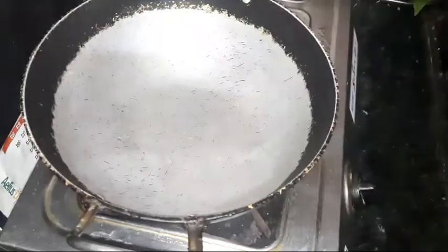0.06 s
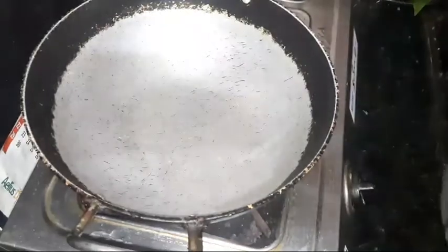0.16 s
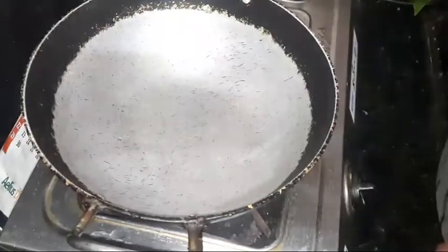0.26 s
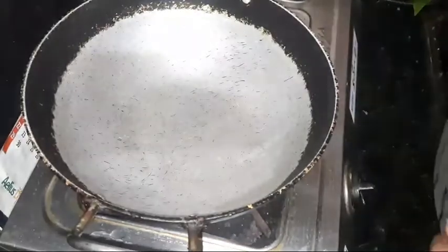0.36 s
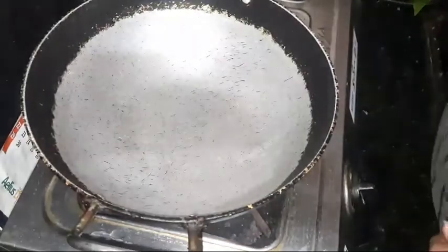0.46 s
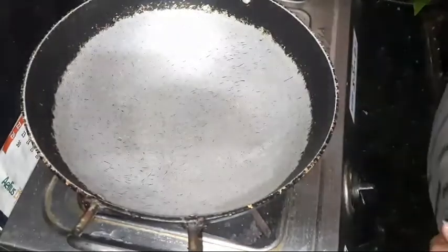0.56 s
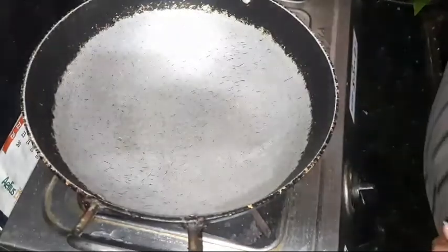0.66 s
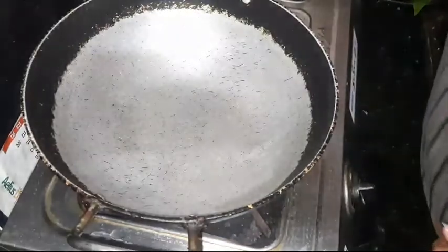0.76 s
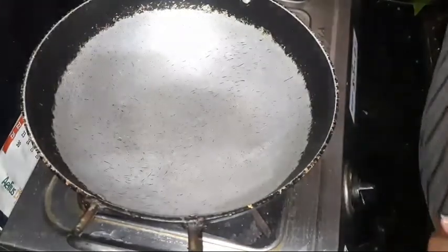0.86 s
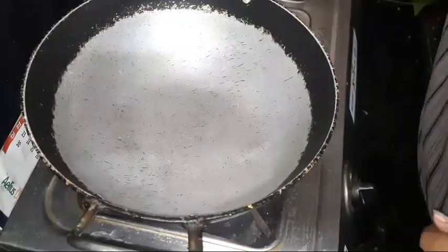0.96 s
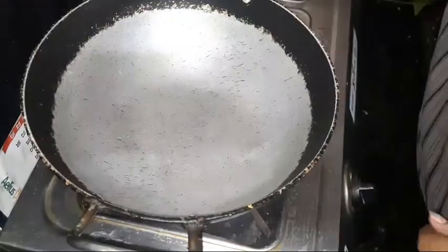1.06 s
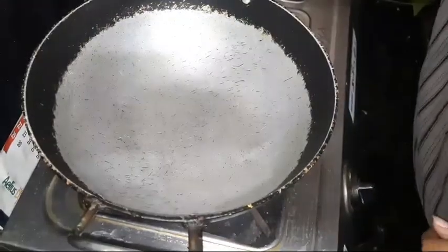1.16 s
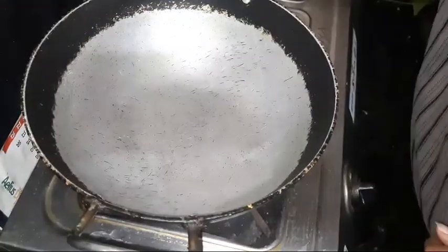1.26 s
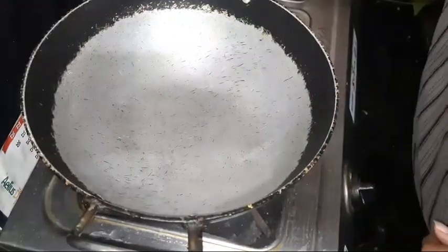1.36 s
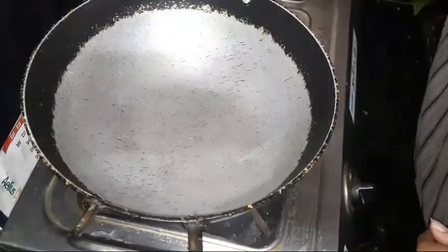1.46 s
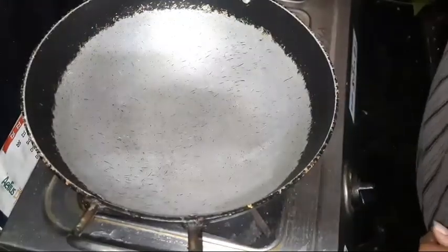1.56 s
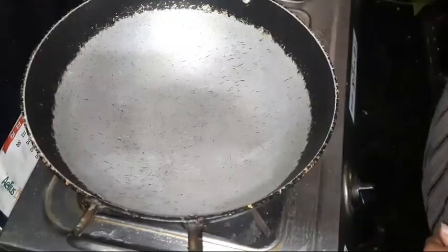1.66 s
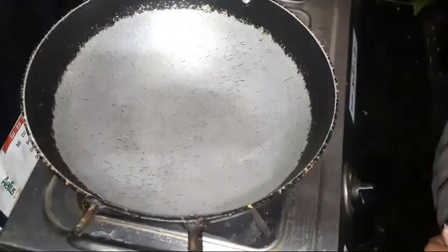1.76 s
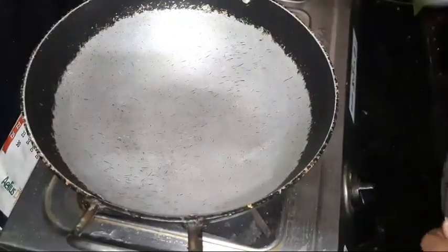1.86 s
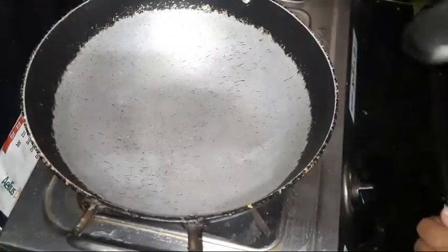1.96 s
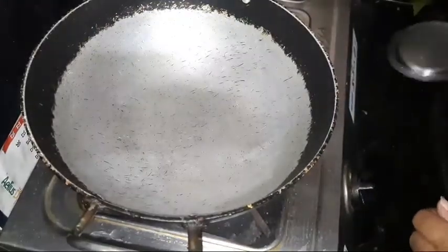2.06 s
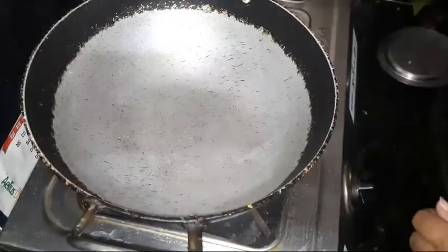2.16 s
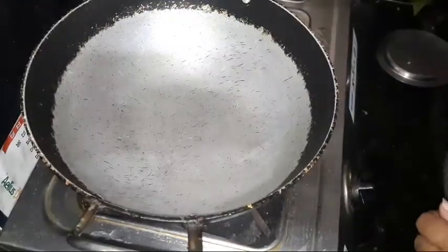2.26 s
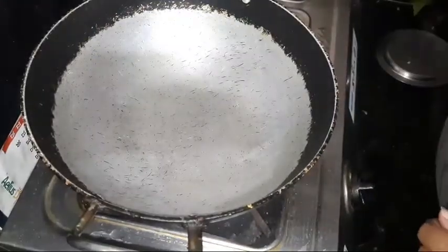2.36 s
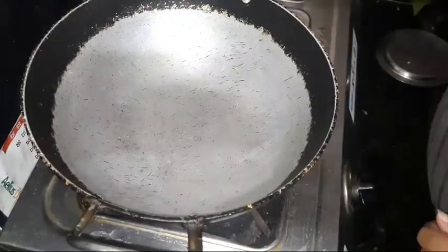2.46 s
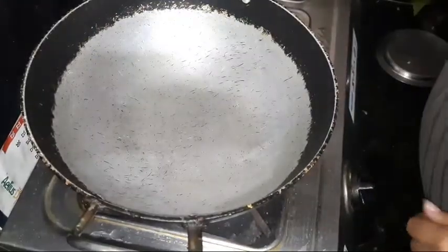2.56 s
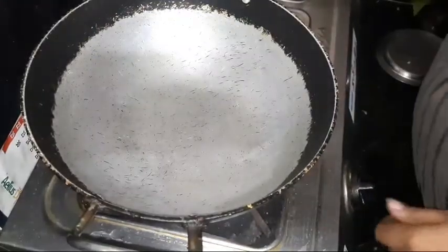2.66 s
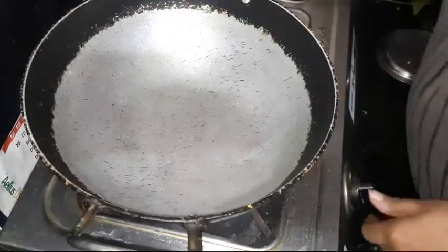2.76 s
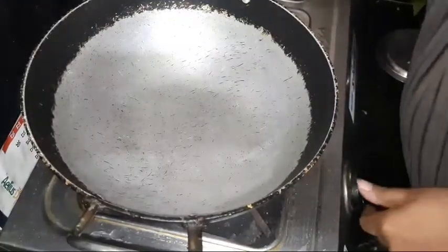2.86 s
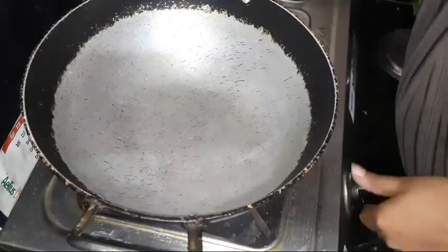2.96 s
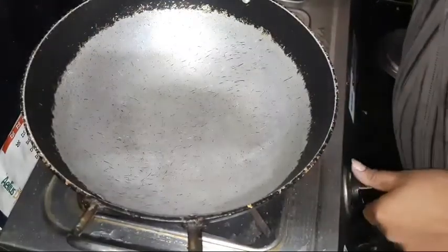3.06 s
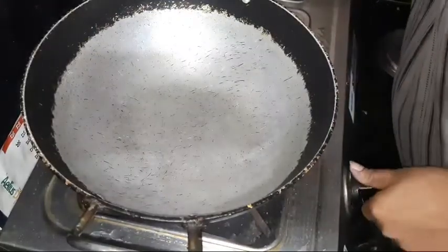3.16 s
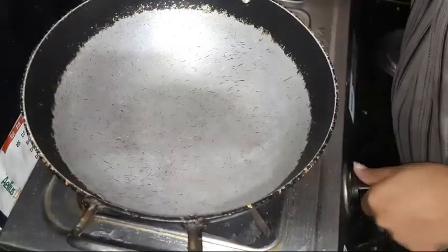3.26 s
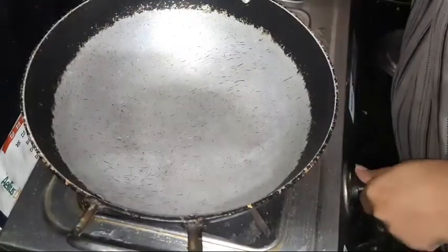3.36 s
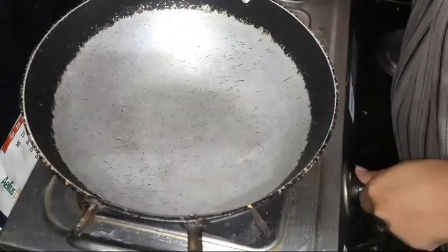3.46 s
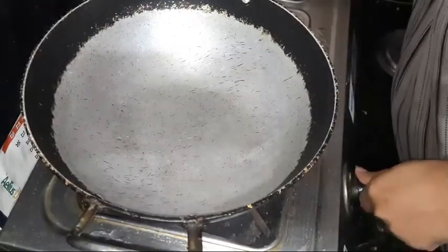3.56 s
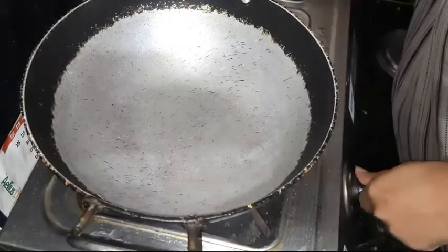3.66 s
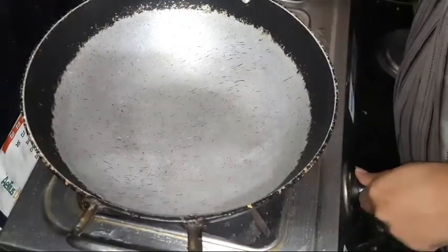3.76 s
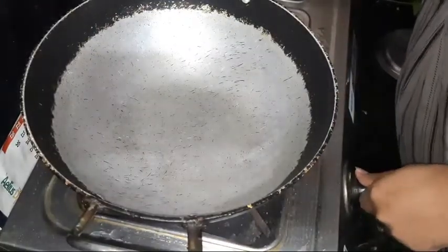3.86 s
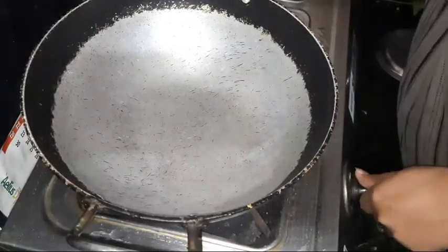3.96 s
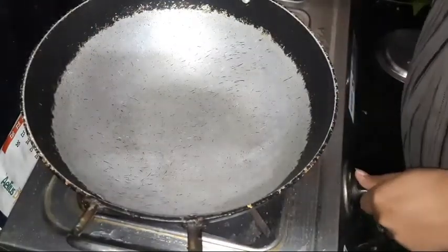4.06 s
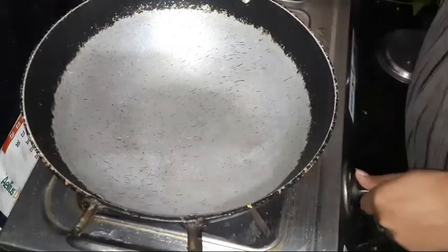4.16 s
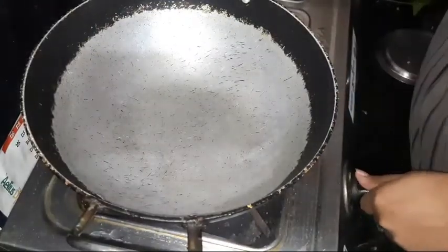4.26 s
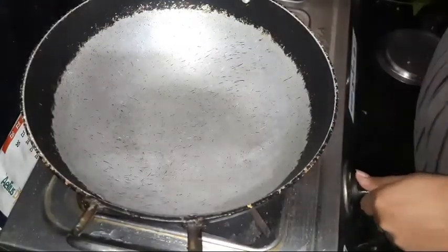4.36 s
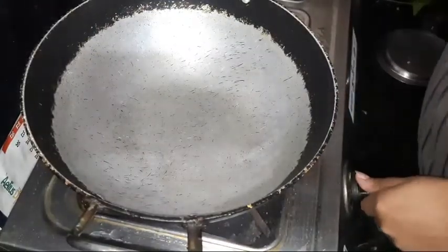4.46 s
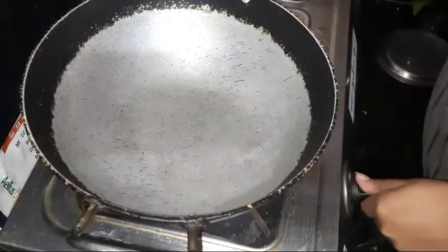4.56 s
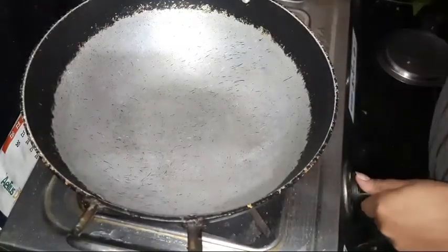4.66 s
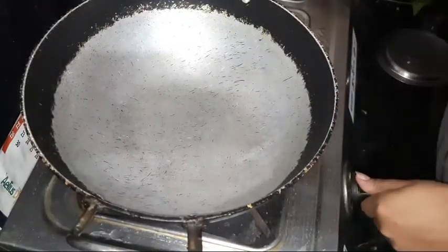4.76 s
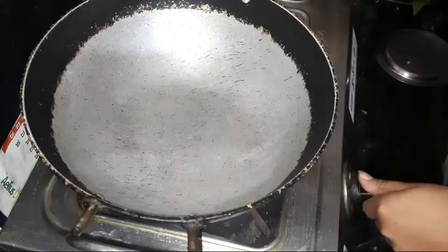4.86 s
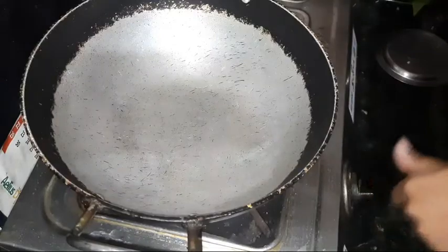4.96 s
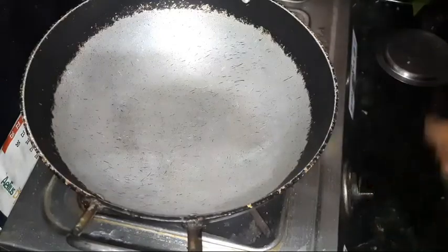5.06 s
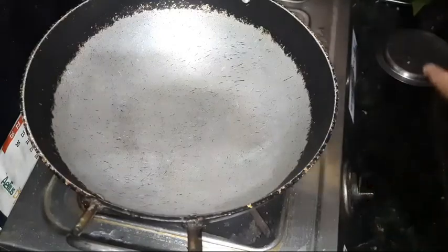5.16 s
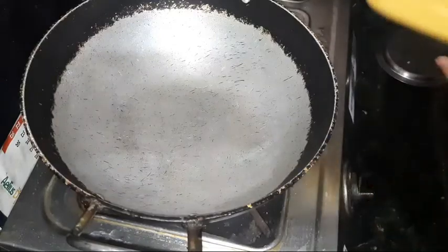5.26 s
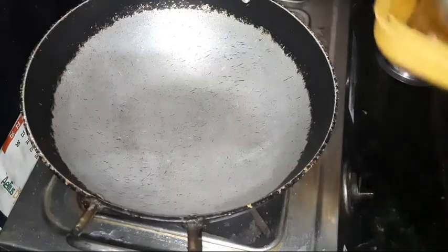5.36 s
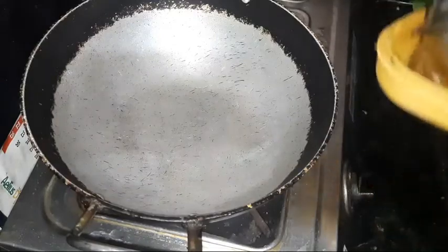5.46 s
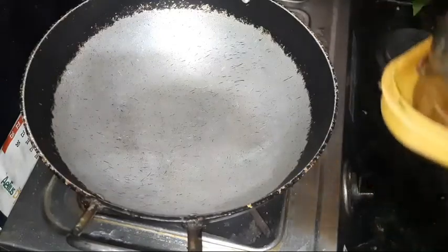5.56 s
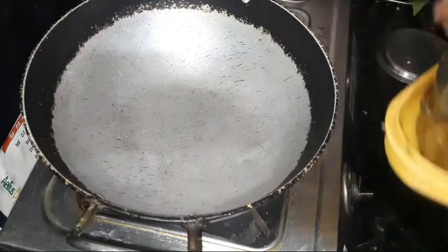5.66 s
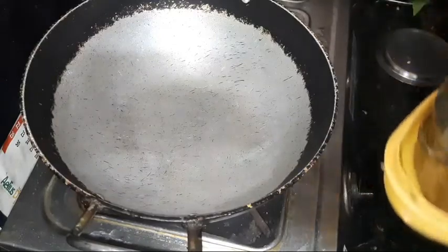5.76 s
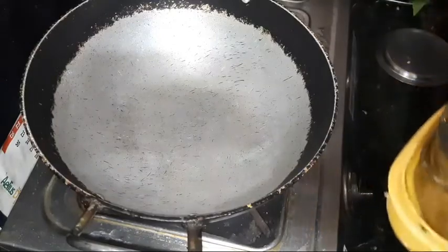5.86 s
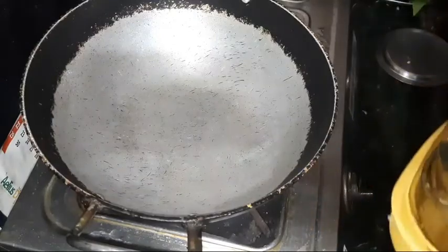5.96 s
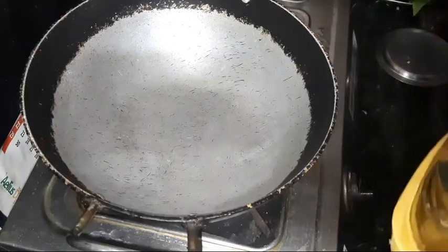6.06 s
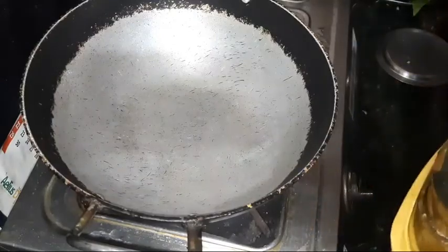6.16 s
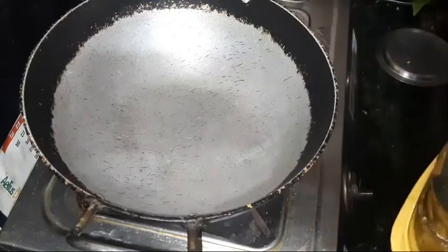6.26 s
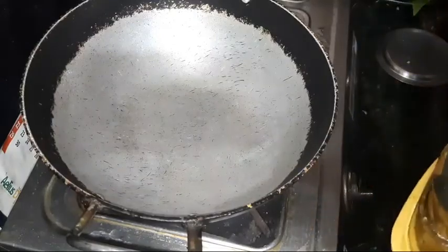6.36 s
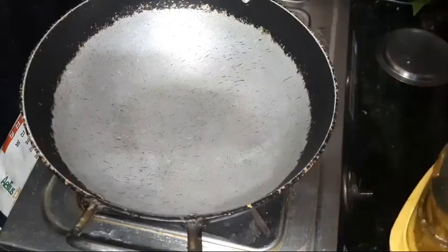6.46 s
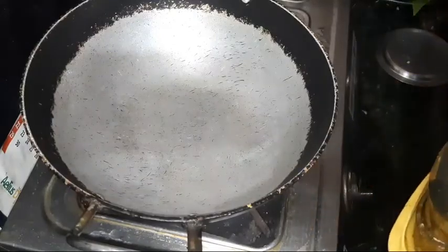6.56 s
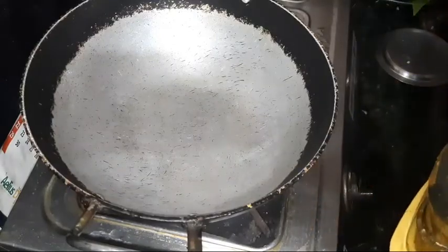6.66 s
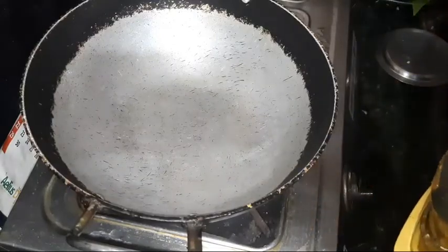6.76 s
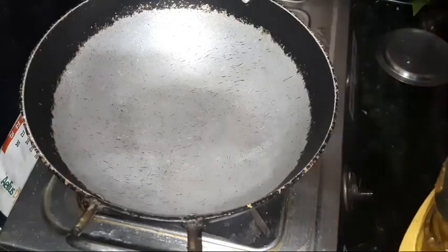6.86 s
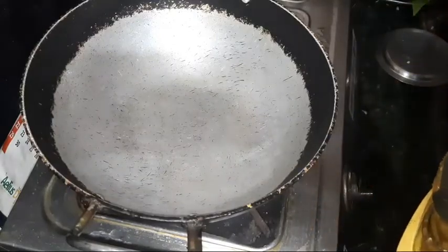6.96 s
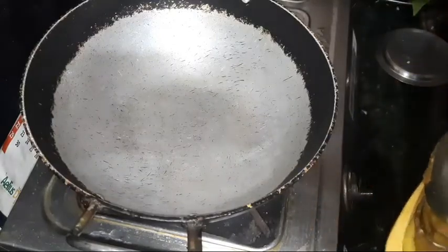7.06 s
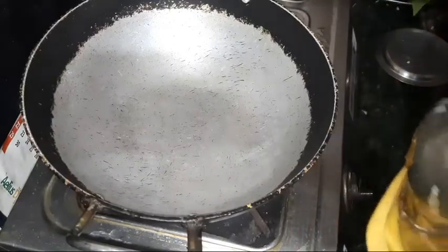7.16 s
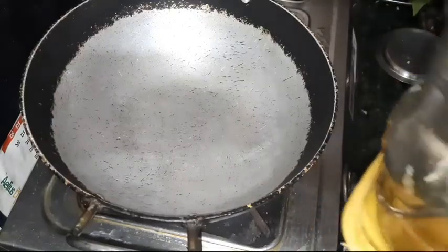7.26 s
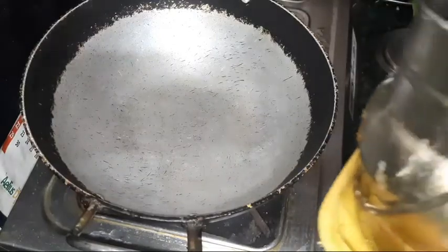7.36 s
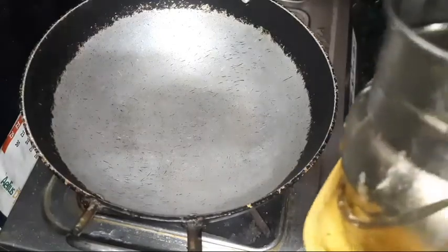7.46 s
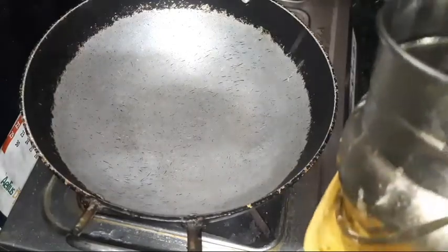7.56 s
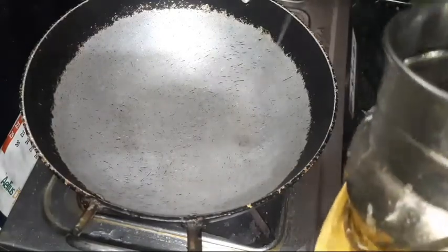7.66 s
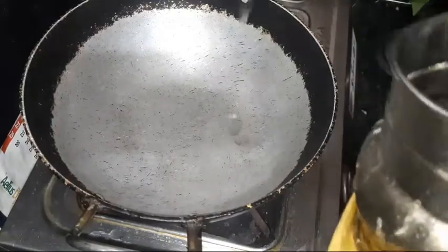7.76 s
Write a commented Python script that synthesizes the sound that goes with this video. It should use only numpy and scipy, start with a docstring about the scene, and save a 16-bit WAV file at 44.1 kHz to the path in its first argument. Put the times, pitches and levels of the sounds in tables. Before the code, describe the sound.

Close phone pickup of someone working at a stove, the actions a little to the right. Dry knocks lead to a short juddering metal scrape and a sharp multi-hit lid clash with a brief thin ring. After a pause, knob clunks, one small spark click and a muffled gas flare; the hiss later drops. Soft brushing follows, then a chattering cap, small twisting ticks and a hollow bump, all with short room reflections.

```python
"""A low wavering hum, room noise and a faint gas hiss come first, in a small hard-walled kitchen.
Dry utensil knocks follow; a steel lid, summed from decaying modes, slides over the counter and clashes down.
A stove knob clunks, a spark snaps, the burner flares in shaped noise, and an oil jug is lifted and opened.
Every blow reaches two microphones directly, the left one late, then off the stove top and the walls."""
import sys
import numpy as np
from scipy import signal
from scipy.fft import rfft, irfft, next_fast_len
from scipy.io import wavfile
from scipy.ndimage import map_coordinates

SR = 44100
rng = np.random.default_rng(int(sys.argv[2]) if len(sys.argv) > 2 else 0)


def digitize_waveform(pressure):
    """Quantize a signal to 16-bit integers and store it at the path in sys.argv[1].

    Rows of a 2-D input are taken as channels; values are limited to [-1, 1].
    """
    field = np.atleast_2d(pressure).T
    bounded = np.clip(field, -1, 1)
    quanta = np.round(bounded * 32767).astype(np.int16)
    wavfile.write(sys.argv[1], SR, quanta)


N = 344068  # samples in the scene
T = np.arange(SR) / SR  # time since a blow, s


def amp(db):
    """Decibels to gain."""
    return 10 ** (np.asarray(db) / 20)


def unit(x):
    """Scale to rms 1."""
    return x / np.sqrt(np.mean(x ** 2) + 1e-20)


def along(points, hz):
    """(f/Hz, value) points read on a log frequency axis."""
    f, value = np.transpose(points)
    return np.interp(np.log(hz + 1), np.log(f), value)


def swell(s, half):
    """A soft bell of gain around time s, down to 1/e at half seconds either side."""
    return np.exp(-((np.arange(N) / SR - s) / half) ** 2)


def stroke(s, rise, hold, t60):
    """Gain that climbs 60 dB in rise seconds to be full at s, holds, then falls 60 dB in t60."""
    t = np.arange(N) / SR - s
    return amp(-60 * (np.maximum(-t, 0) / rise + np.maximum(t - hold, 0) / t60))


def wobble(rate):
    """A smooth random curve, rate knots a second."""
    knots = rng.standard_normal(int(N * rate / SR) + 4)
    return map_coordinates(knots, [np.arange(N) * rate / SR])


def filtered(x, response):
    """x with its spectrum multiplied by a response of frequency."""
    n = x.shape[-1]
    m = next_fast_len(n + 8192, True)
    return irfft(rfft(x, m) * response(np.fft.rfftfreq(m, 1 / SR)), m)[..., :n]


# likeness of the two microphones' noise: f/Hz, correlation
ALIKE = [(100, 0.97), (300, 0.75), (600, .5), (1200, -0.13), (2500, 0.026), (5000, 0.041)]


def diffuse(size):
    """White noise from all sides: alike at both microphones only in the bass."""
    def mid_side_gains(hz):
        turn = np.arccos(np.clip(along(ALIKE, hz), -1, 1)) / 2
        return np.array([np.cos(turn), np.sin(turn)])
    mid, side = filtered(rng.standard_normal((2, size)), mid_side_gains)
    return np.array([mid + side, mid - side])


def rush(spectrum):
    """Coloured stereo noise of rms 1."""
    return unit(filtered(diffuse(N), lambda hz: amp(along(spectrum, hz))))


def pulse(spectrum, tilt=0):
    """The causal (minimum-phase) click of this spectrum, tilted in dB per octave."""
    hz = np.fft.rfftfreq(SR, 1 / SR)
    level_db = along(spectrum, hz) + tilt * np.log2(1 + hz / 300)
    cepstrum = irfft(np.log(amp(level_db)), SR)
    return irfft(np.exp(rfft(2 * cepstrum * (T < .5))), SR)


def body(resonances):
    """Decaying sines of (f/Hz, width/Hz, level/dB) resonances; wider ones die sooner."""
    return sum(amp(db) * width * np.exp(-np.pi * width * T) * np.sin(2 * np.pi * hz * T)
               for hz, width, db in resonances)


def chatter(life):
    """Noise of a contact that builds and breaks up within a few milliseconds; life in s."""
    return rng.standard_normal(SR) * T / life * np.exp(-T / life)


def snap(spectrum, life):
    """The coloured snap of a chattering contact."""
    return signal.fftconvolve(pulse(spectrum), chatter(life))[:SR]


# reverberation of the hard-walled kitchen: f/Hz, t60/s
KITCHEN_DECAY = [(80, 0.3), (300, 0.28), (1000, 0.28), (4000, 0.26), (9000, 0.23), (15000, 0.21)]


def kitchen(direct_db, lag, near_db=-8):
    """Path to the microphones: the direct sound, a quick splash off the stove top, then the walls."""
    hz, t, z = signal.stft(diffuse(SR // 2), SR, nperseg=256)
    decay = amp(-60 * t / along(KITCHEN_DECAY, hz)[:, None])
    tail = signal.istft(z * decay, SR, nperseg=256)[1]
    since = T[:tail.shape[1]]
    walls = tail * (1 - np.exp(-since / 0.0058))
    near = tail * np.exp(-since / 0.0018)
    path = walls / np.linalg.norm(walls[0]) + amp(near_db) * near / np.linalg.norm(near[0])
    # the blows are on the right: the left microphone hears them lag samples later
    path[[0, 1], [lag, 0]] += amp(direct_db)
    return path


def add(out, s, db, sound, direct_db, lag=19):
    """Play one blow through the kitchen at time s; db is its energy spread over 50 ms."""
    heard = signal.fftconvolve(sound[None], kitchen(direct_db, lag), axes=1)
    heard *= amp(db) * np.sqrt(SR / 10 / np.sum(heard ** 2))
    start = round(s * SR)
    out[:, start:start + heard.shape[1]] += heard[:, :N - start]


# colour of the room noise: f/Hz, relative level/dB
ROOM_NOISE = [(25, -7.5), (50, -5.5), (85, 5), (150, -1.5), (350, 0.5), (470, -0.5), (620, -8), (1000, -6),
              (1500, -14), (3000, -26), (7000, -32.5), (15000, -39)]
# steady low tones: f/Hz, level/dB before the slow level curve
HUM = [(79, -66), (101, -62), (196, -70), (277, -73), (316, -70), (350, -71.5)]
# slow level curve of room noise and hum: t/s, gain/dB
ROOM_LEVEL = [(0.1, -2.5), (.6, -0.5), (2.3, 0.5), (2.85, -3.5), (3.2, 1.5), (4.2, 1.5), (4.9, -0.5),
              (6.9, 0.5), (7.3, -1), (7.7, 0)]
# dull rustles of someone moving at the stove: t/s, half length/s, level/dB
RUSTLES = [(0.706, 0.13, -59), (3.207, 0.15, -65.5), (6.804, 0.56, -62), (7.72, 0.38, -60)]
ROOM_DB, ROOM_WAVER_DB = -61.5, 1.74  # room noise before the slow curve, and its unevenness


def background():
    """Room noise and wavering hum tones that rise and sink together, and dull noise rustles."""
    t = np.arange(N) / SR
    room = amp(ROOM_DB + ROOM_WAVER_DB * wobble(18)) * rush(ROOM_NOISE)
    rustle = sum(amp(db) * swell(s, half) for s, half, db in RUSTLES) * rush(ROOM_NOISE)
    hum = 0
    for hz, db in HUM:
        waver = wobble(11) + 1j * wobble(11) + 0.6
        hum = hum + amp(db) * unit(np.real(waver * np.exp(2j * np.pi * hz * t)))
    return amp(np.interp(t, *np.transpose(ROOM_LEVEL))) * (room + hum) + rustle


# steps in the flow of gas: t/s at mid-step, hiss level/dB from then on
VALVE = [(0, -65.5), (.4, -62.5), (3.54, -60), (4.52, -70)]
# colour of the gas hiss: f/Hz, relative level/dB
GAS = [(500, -18.5), (2000, -14), (4500, -7), (7000, -11), (10000, 0.5), (12000, -5), (15000, -9.5)]
# colour of soft thuds: f/Hz, relative level/dB
THUD = [(25, -22.5), (55, -23), (78, 7.5), (110, -3.5), (170, -18.5), (300, -43.5), (1000, -77.5)]
# colour of the spark and the flame's whoosh: f/Hz, relative level/dB
SPARK_TONE = [(300, 3), (700, -1.5), (1500, -0.5), (2700, 2.5), (4000, -2.5), (6000, -4), (10000, -2.5),
              (15000, -7.5)]
VALVE_TURN_S = 0.17  # time each step in the flow takes
FLARE_S, FLARE_RISE_S, FLARE_HOLD_S, FLARE_T60_S = 3.62, .4, .12, 0.3
FLARE_DB, FLARE_ROAR_DB, FLARE_WHOOSH_DB = -51.5, -54, -57.5  # thud, roar, whoosh


def burner():
    """The gas hisses as far as the valve is open; the flame catches with a soft thud, roar and whoosh."""
    t = np.arange(N) / SR
    hiss_db = VALVE[0][1]
    for (_, before), (s, db) in zip(VALVE, VALVE[1:]):
        hiss_db = hiss_db + (db - before) * np.clip((t - s) / VALVE_TURN_S + .5, 0, 1)
    flame = amp(FLARE_DB) * rush(THUD)
    flame += amp(FLARE_ROAR_DB) * rush(ROOM_NOISE)
    flame += amp(FLARE_WHOOSH_DB) * rush(SPARK_TONE)
    flare = stroke(FLARE_S, FLARE_RISE_S, FLARE_HOLD_S, FLARE_T60_S)
    return amp(hiss_db) * rush(GAS) + flare * flame


# dry utensil knocks: t/s, level/dB before each layer's offset, tilt/(dB per octave)
KNOCKS = [(0.382, -30.5, 1), (0.494, -37.5, -2), (0.573, -43, 3.5), (.635, -18, 1), (0.698, -25.5, 2),
          (.838, -43.5, 4), (4.918, -44, -5.5), (4.955, -49, -6)]
# colour of a utensil knock: f/Hz, relative level/dB
UTENSIL = [(40, -48.5), (80, -6), (250, 1.5), (450, 0.5), (750, 2), (1400, -6), (2200, -7.5), (4500, -13),
           (6500, -16.5), (15000, -19.5)]
# colour of bright cracks and grit: f/Hz, relative level/dB
CRACK = [(300, -11.5), (1100, -1.5), (2500, -2), (5000, -3), (7300, -1.5), (9000, -1), (12000, -2),
         (15000, -11.5)]
KNOCK_THUD_DB, KNOCK_THUD_DELAY_S = -27.5, 0.027  # the stove top booms softly after a knock
LEAD_IN_DB, LEAD_IN_RISE_S = -33, 0.36  # slide before a knock: offset from its table level, 60 dB rise


def utensils():
    """A brief noise slide, then a dry knock with no ring of its own and a soft, late thud."""
    sliding = sum(amp(db + LEAD_IN_DB) * stroke(s, LEAD_IN_RISE_S, hold=0, t60=.05) for s, db, _ in KNOCKS)
    out = sliding * rush(CRACK)
    for s, db, tilt in KNOCKS:
        add(out, s, db - 12, pulse(UTENSIL, tilt), direct_db=-23.0)
        add(out, s + KNOCK_THUD_DELAY_S, db + KNOCK_THUD_DB, pulse(THUD), direct_db=-5)
    return out


# hollow bumps on the counter: t/s, level/dB
BUMPS = [(1.178, -46.5), (1.25, -47.5), (1.322, -42), (1.355, -40), (1.376, -42), (1.391, -35),
         (4.92, -50.5), (4.958, -59.5)]
# contacts of the lid: t/s, then lid, counter knock and thud level/dB before each layer's offset, grip/0-1
LID_HITS = [(1.3913, -46, -32.5, -54.5, 0.6), (1.412, -34, -31.5, -55.5, 0.2),
            (1.436, -27.5, -50, -57, 0.25), (1.468, -22, -30.5, -59, 0), (2.0497, -18, -22.5, -32, 0.85),
            (2.134, -18, -23.5, -35.5, 0.91), (2.2452, -12.5, -43.5, -46.5, 1),
            (2.2552, -3, -33.5, -51.5, 0), (2.2793, -9.5, -33.5, -38, 0.08),
            (2.303, -15.5, -42.5, -45, 0.15)]
# boom of the hollow counter at pitch ratio 1: f/Hz, relative level/dB
HOLLOW = [(70, -30), (170, 1.5), (260, 3.5), (370, -7), (550, -20), (1200, -40), (4000, -58)]
SCRAPE_S = 1.392  # the lid slides fastest here
BUMP_REST_OCT, BUMP_GLIDE_OCT = -0.17, 0.69  # pitch of a bump at rest, its rise at top speed
BUMP_SPEEDUP_S = 0.11  # time constant of the lid's speed
HOLLOW_DB, HOLLOW_PITCH = -16, 1.4  # boom under the lid: offset from the knock's table level, pitch ratio
SHUDDER_DB, SHUDDER_T60_S = -39.5, .6  # shudder under the lid: offset from the lid's table level, decay


def counter():
    """The sliding lid judders higher as it speeds up; the hollow counter booms and shudders at each contact."""
    def boom(pitch):
        return pulse([(hz * pitch, level) for hz, level in HOLLOW])
    shudder = sum(amp(db + SHUDDER_DB) * stroke(s, rise=.01, hold=0, t60=SHUDDER_T60_S)
                  for s, db, *_ in LID_HITS)
    out = shudder * rush(ROOM_NOISE)
    for s, db in BUMPS:
        speed = np.exp(-abs(s - SCRAPE_S) / BUMP_SPEEDUP_S)
        add(out, s, db, boom(2 ** (BUMP_REST_OCT + BUMP_GLIDE_OCT * speed)), direct_db=-5.5)
    for s, _, knock_db, *_ in LID_HITS:
        add(out, s, knock_db + HOLLOW_DB, boom(HOLLOW_PITCH), direct_db=-7.5)
    return out


# modes of the lid while a hand holds it: f/Hz, level/dB, t60/s before the grip's extra damping
HELD_MODES = [(1710, -5, .09), (1935, -15, .4), (2360, -4, .07), (2805, -12, .28), (3250, -1.5, .13),
              (3768, -13, .22), (4130, -4, .06), (4660, -7, .06), (4920, -5, .05), (6330, -4, .15),
              (7668, -11, .22), (8580, -7, .05), (8745, -3, .1), (9448, -8, .42), (10200, -2, .16),
              (11400, -4, .12), (11830, -3, .08), (12420, -8, .2), (13550, -7, .04), (15030, -7, .04)]
# colour of the counter's knock and drag: f/Hz, relative level/dB
COUNTER = [(60, -16), (150, -14), (320, 4), (520, -4.5), (720, -1), (1100, -5), (1600, -11.5), (3000, -27),
           (12000, -51.5)]
SCRAPE_RISE_S, SCRAPE_HOLD_S, SCRAPE_T60_S = 0.08, .055, .05
SCRAPE_DB, DRAG_DB = -44, -45.5  # the lid's rim, the counter under it
SLIP_DB, GRIT_DB = 4, -47  # unevenness of the rim's slips; level of their grit
SHIFT_DB, SHIFT_RATE = 5, 50  # the moving contact favours mode after mode: depth, knots a second
SCRAPE_DULL_HZ = 4170  # rubbing drives the modes above this ever less


def scrape():
    """The rim sticks and slips: uneven grit, with held-lid modes each swelling in its own time."""
    t = np.arange(N) / SR
    slips = amp(SLIP_DB * wobble(260))
    rim = np.zeros(N)
    for hz, db, _ in HELD_MODES:
        if hz < 11000:
            drive = amp(SHIFT_DB * wobble(SHIFT_RATE)) * np.exp(1.5j * wobble(260))  # uneven level, phase
            dulling = 1 + (hz / SCRAPE_DULL_HZ) ** 2
            rim += amp(db) / dulling * np.real(drive * np.exp(2j * np.pi * hz * t))
    grit = amp(GRIT_DB) * unit(slips * rush(CRACK))
    drag = amp(DRAG_DB) * rush(COUNTER)
    slide = stroke(SCRAPE_S, SCRAPE_RISE_S, SCRAPE_HOLD_S, SCRAPE_T60_S)
    return slide * (amp(SCRAPE_DB) * unit(rim) + grit + drag)


# the lid sings on when lifted clear and after the clash: t/s at full, level/dB, f/Hz, t60/s, damped from t/s
SINGING = [(1.53, -63, 1933, 3.5, 1.75), (1.545, -54, 9448, .35, 1.6), (2.43, -52, 1933, .5, 2.56),
           (2.43, -62, 3775, .7, 2.62), (2.44, -60, 11370, .6, 2.6), (2.5, -54, 5001, 0.95, 2.8)]
SING_RISE_S, DAMPED_T60_S = .25, .6  # 60 dB swell; t60 of the damping added at the end
BEAT_HZ, TWIN_DB = 7, -10.5  # beat rate and relative level of the twin mode
SING_WAVER_DB = 2  # unevenness of the ring


def singing():
    """The lid's long modes swell and sing on, each beating with a weak twin, until they are damped."""
    t = np.arange(N) / SR
    out = np.zeros(N)
    for s, db, hz, t60, stop in SINGING:
        mode = np.sin(2 * np.pi * hz * (t - s))
        twin = amp(TWIN_DB) * np.sin(2 * np.pi * (hz + BEAT_HZ) * (t - s))
        level = amp(db + SING_WAVER_DB * wobble(22)) * stroke(s, SING_RISE_S, 0, t60)
        damping = amp(-60 * np.maximum(t - stop, 0) / DAMPED_T60_S)
        out += level * damping * (mode + twin)
    return out


# level of the sheet's many weak modes: f/Hz, level/dB before an offset and scatter
SHEET = [(1000, -10.5), (1300, 1), (1700, 2), (2400, -5), (2950, -7.5), (4000, 1), (5000, -1.5), (5700, -5),
         (6500, 2), (7400, -14.5), (8800, 3.5), (10800, -11), (12000, -4), (13800, -21.5)]


def sheet_modes(count=80):
    """Thin steel has many weak, short modes between the strong ones: (f/Hz, level/dB, t60/s)."""
    hz = 1000 + (np.arange(count) + rng.random(count)) * 14500 / count
    db = along(SHEET, hz) - 14 + 3 * rng.standard_normal(count)
    return np.transpose([hz, db, np.full(count, .07)])


def steel(modes, grip, scatter_db):
    """Modes struck with new strengths and signs; a gripping hand damps the higher ones most."""
    hz, db, t60 = np.transpose(modes)
    strength = amp(db + scatter_db * rng.standard_normal(len(hz))) / np.sqrt(t60)
    strength = strength * rng.choice([-1, 1], len(hz))
    fade_db = 60 / t60 + grip * np.interp(hz, [2000, 4500], [10, 190])  # per second
    ring = np.zeros(SR)
    for f, gain, fade in zip(hz, strength, fade_db):
        t = T[T < 70 / fade]  # stop after a 70 dB decay
        ring[:len(t)] += gain * amp(-fade * t) * np.sin(2 * np.pi * f * t)
    return ring


# modes of the steel lid let go: f/Hz, level/dB, t60/s before the grip's extra damping
FREE_MODES = [(716, -11, .2), (1228, -9, .14), (1285, -3, .09), (1647, -15, .1), (1933, -20, .4),
              (2338, -1, .06), (2695, -9, .08), (2800, -20, .25), (3210, -3, .12), (3775, -12, .3),
              (4203, -4, .06), (4420, -10, .05), (4691, -3, .12), (4925, -2, .06), (5001, -20, .5),
              (5250, -9, .04), (6062, -7, .2), (6395, -1, .13), (6627, -6, .11), (7677, -22, .4),
              (8735, -2, .08), (8885, -1, .04), (9455, -19, .3), (10248, 1, .17), (11370, -16, .35),
              (11820, -4, .05), (12090, -6, .08), (12922, -3, .13), (14360, -20, .05), (15080, -6, .07)]
# resonances of the counter: f/Hz, width/Hz, relative level/dB
BOARD = [(315, 35, -1), (447, 20, -7), (716, 34, 0), (914, 24, -4), (1057, 30, -7)]
BOARD_DB = -9.5  # their ring: offset from the knock's table level
LET_GO_S = 2.2  # the free lid's modes sound from here on
GRIP_DETUNE = .008  # typical share by which a full grip pulls each mode off pitch


def lid():
    """Each contact rings the steel, cracks at the rim and knocks the counter; grip detunes and damps."""
    out = np.zeros((2, N))
    for s, db, knock_db, thud_db, grip in LID_HITS:
        modes = np.vstack([HELD_MODES if s < LET_GO_S else FREE_MODES, sheet_modes()])
        modes[:, 0] *= 1 + GRIP_DETUNE * grip * rng.standard_normal(len(modes))
        add(out, s, db - 14.0, steel(modes, grip, scatter_db=1), direct_db=-3.5)
        add(out, s, db - 25.0, pulse(CRACK), direct_db=-11.5)
        add(out, s, knock_db - 9.5, pulse(COUNTER), direct_db=-10.5)
        add(out, s, knock_db + BOARD_DB, body(BOARD), direct_db=-3.5)
        add(out, s, thud_db - 5.5, pulse(THUD), direct_db=-3.5)
    return out


# soft brushing sounds: t/s, half length/s, level/dB, centre f/Hz
BRUSHES = [(1.81, 0.13, -64, 1810), (3.087, 0.093, -60, 526), (7.6, .35, -70, 1850)]
# something brushes along as the jug is lifted: t/s, half length/s, level/dB
SWISHES = [(5.443, 0.025, -62.5), (5.506, 0.053, -59.5), (5.586, 0.016, -63), (5.633, .03, -61.5)]
# colour of those swishes: f/Hz, relative level/dB
SWISH = [(300, -25), (800, -7), (1150, 4), (1500, -3.5), (2000, -13), (3000, -19.5), (4500, -17),
         (7000, -18.5), (10000, -18), (15000, -22.5)]


def brushes():
    """Soft swells of narrow noise and broader swishes as things are moved about."""
    out = sum(amp(db) * swell(s, half) for s, half, db in SWISHES) * rush(SWISH)
    for s, half, db, hz in BRUSHES:
        band = [(hz / 2, -30), (hz * 0.84, -11), (hz * 0.955, 0), (hz * 1.21, -13), (hz * 2, -32), (hz * 6, -50)]
        out += amp(db) * swell(s, half) * rush(band)
    return out


# clunks of the knob: t/s, level/dB before each layer's offset, f/Hz, swell time constant/s, body level/dB
CLUNKS = [(3.4626, -32.5, 1480, 0.00054, -8), (3.468, -32, 1670, 0.0011, -3),
          (3.472, -31.5, 1176, 0.0012, -4.5), (3.887, -25.5, 1742, 0.0019, -6.5),
          (3.911, -36, 1753, 0.0013, -5.5)]
# partials of a clunk: frequency ratio, relative level/dB
PING = [(1, 1.5), (1.57, -17.5), (1.95, -12), (2.41, -18.5), (2.75, -20)]
# the stove's sheet body: f/Hz, width/Hz, relative level/dB
STOVE = [(346, 31, 2), (476, 39, -1.5), (208.2, 32, -17), (1062, 130, -12)]


def clunks():
    """A small part close by swells into a short ping with weak overtones; the stove's sheet body answers."""
    out = np.zeros((2, N))
    for s, db, hz, rise, body_db in CLUNKS:
        partials = sum(amp(level) * np.sin(2 * np.pi * ratio * hz * T) for ratio, level in PING)
        ping = (T / rise) ** 1.53 * np.exp(-T / rise) * partials
        add(out, s, db - 11, ping, direct_db=3.5, lag=22)
        add(out, s, db - 12.0 + body_db, body(STOVE), direct_db=-8.0)
        add(out, s, db - 23.5, pulse(UTENSIL, 1), direct_db=-9)
    return out


# the snap that lights the gas: t/s, level/dB
SPARK = (3.536, -39.5)


def spark():
    """One bright click, heard mostly off the stove top and walls."""
    out = np.zeros((2, N))
    add(out, *SPARK, pulse(SPARK_TONE), direct_db=-31)
    return out


# clicks of the jug's cap coming loose: t/s, ring and snap level/dB before each layer's offset
JUG_HITS = [(6.0868, -29.5, -40), (6.097, -32, -29), (6.108, -20, -17.5), (6.144, -32, -40),
            (6.1775, -32.5, -31.5), (6.2363, -34, -35), (6.247, -30, -32), (6.344, -47, -55)]
# resonances of the jug: f/Hz, width/Hz, relative level/dB
JUG = [(461, 35, 9), (704, 180, -5.5), (1060, 230, -5), (1767, 30, 9.5), (2680, 150, 5.5), (2900, 130, 1.5),
       (3470, 14, 15), (4200, 110, -1.5), (5050, 110, -0.5), (5430, 150, -1), (6170, 90, 3),
       (6900, 120, -15)]
# snap of the cap: f/Hz, relative level/dB
CAP = [(400, -12), (1500, 4), (2700, -13), (4300, -3), (5100, -6), (6300, -7.5), (7500, -4), (10000, -10),
       (15000, -13)]
# short twists of the cap on its thread: t/s, rubbing level/dB, tick level/dB before its offset
TWISTS = [(6.15, -53, -50), (6.24, -45.5, -50), (6.275, -54, -45), (6.353, -58.5, -53), (6.474, -62.5, -51),
          (6.53, -60.5, -58), (6.5932, -55, -48), (6.634, -69, -55), (6.66, -55, -34.5), (6.75, -59.5, -54),
          (6.804, -58.5, -54), (6.854, -57, -54), (6.903, -63.5, -54.5)]
# colour of the rubbing: f/Hz, relative level/dB
RUB = [(300, 5), (1250, -6), (1770, 13), (2200, -8), (2710, 4), (3050, -12), (3340, 3), (3700, -14),
       (4100, 1.5), (4700, -16), (5700, -12), (6730, 0), (8400, -4), (9600, -1), (13000, -1), (15500, -5)]
# tick of the cap's thread: f/Hz, relative level/dB
THREAD = [(1000, -16), (2700, -8), (5400, -24), (6730, 8), (8400, -8), (9600, 0), (13000, -7), (15000, -9)]
# a hollow bump of the jug: t/s, level/dB
JUG_BUMP = (6.4735, -42.5)
# resonances of that bump: f/Hz, width/Hz, relative level/dB
JUG_BASE = [(346, 34, 2.5), (990, 100, -20), (1205, 59, -20), (1620, 45, -14), (1770, 45, -17),
            (2720, 51, -24)]
# the jug's wall gives under the grip with a low thud: t/s, level/dB
JUG_FLEX = (6.548, -56)
TWIST_RISE_S, TWIST_HOLD_S, TWIST_T60_S = 0.11, 0.0054, 0.2
TWIST_RING_DB = -10  # ring of the jug: offset from the rubbing's table level
BUMP_SOFT_S = .00006  # softness of the bump's contact


def jug():
    """The cap chatters loose, then ticks and rubs in uneven grains as it twists; the jug bumps and flexes."""
    rubbing = sum(amp(db) * stroke(s, TWIST_RISE_S, TWIST_HOLD_S, TWIST_T60_S) for s, db, _ in TWISTS)
    out = rubbing * unit(rush(RUB) * amp(3 * wobble(170)))
    for s, ring_db, snap_db in JUG_HITS:
        ring = signal.fftconvolve(body(JUG), chatter(life=0.0012))[:SR]
        add(out, s, ring_db - 16.0, ring, direct_db=-0.5)
        add(out, s, snap_db - 20.0, snap(CAP, life=0.0021), direct_db=-0.5)
    for s, db, tick_db in TWISTS:
        add(out, s, db + TWIST_RING_DB, body(JUG), direct_db=-3)
        add(out, s, tick_db - 22.0, snap(THREAD, life=0.0018), direct_db=2.0)
    bump = signal.fftconvolve(body(JUG_BASE), np.exp(-T / BUMP_SOFT_S))[:SR]
    add(out, *JUG_BUMP, bump, direct_db=-4.5)
    add(out, *JUG_FLEX, pulse(THUD), direct_db=-3)
    return out


# peaks and nulls of the room's standing waves: f/Hz, gain/dB
STANDING = [(50, -2.5), (75, 1.5), (100, 1.5), (125, 4), (160, -4.5), (195, 0.5), (280, -1), (350, 1)]


def scene():
    """Everything in the kitchen, coloured by its standing waves and a touch louder on the right."""
    mix = background() + burner() + utensils() + counter() + scrape() + singing() + lid()
    mix = mix + brushes() + clunks() + spark() + jug()
    return filtered(mix, lambda hz: amp(along(STANDING, hz))) * amp([[-.3], [.3]])


TOP_HZ = 15550  # band limit of the phone


def record(dry):
    """The phone's microphones thin the deep bass; its steep low-pass removes what lies above the band."""
    thin = signal.sosfilt(signal.butter(2, 45, "high", fs=SR, output="sos"), dry)
    return filtered(thin, lambda hz: 1 / (1 + (hz / TOP_HZ) ** 160))


dry = scene()
out = record(dry)
digitize_waveform(out)
```